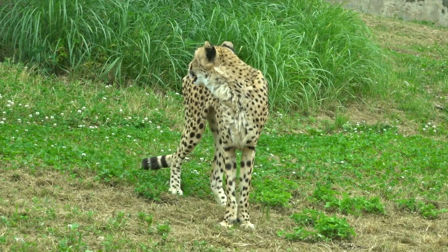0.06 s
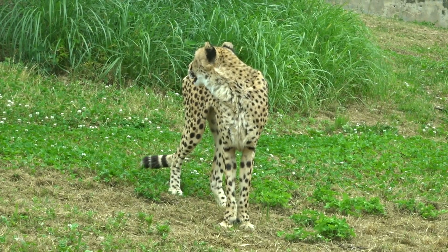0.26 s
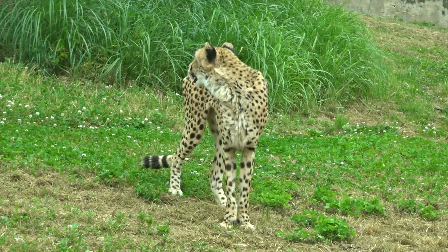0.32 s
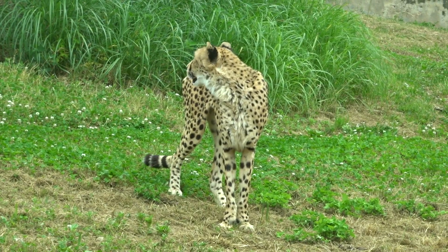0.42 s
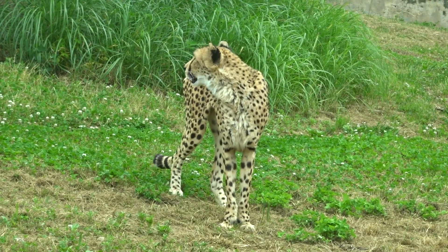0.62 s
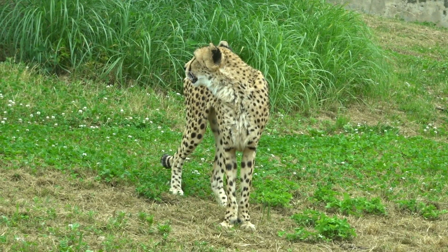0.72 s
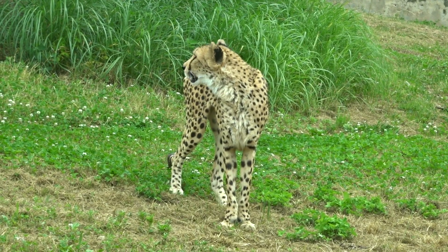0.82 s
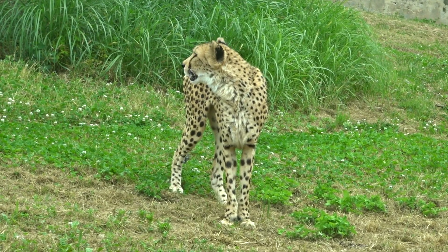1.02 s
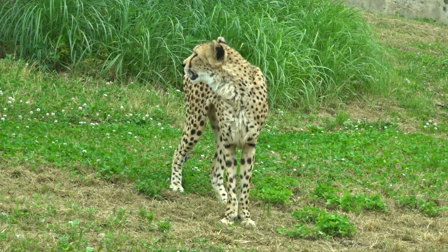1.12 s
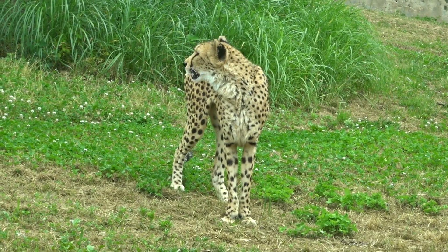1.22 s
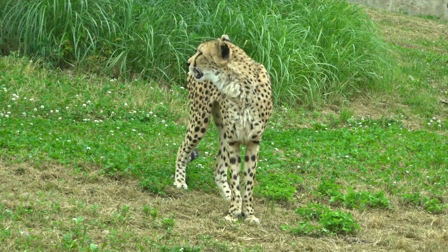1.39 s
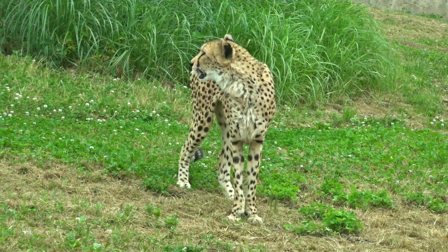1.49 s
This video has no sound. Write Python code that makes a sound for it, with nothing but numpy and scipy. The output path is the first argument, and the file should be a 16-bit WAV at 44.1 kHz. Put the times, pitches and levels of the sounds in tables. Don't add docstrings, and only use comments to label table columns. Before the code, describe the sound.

A small bird close on the left gives a raspy whistle leaping upward at 0.23-0.34 s, then a fast swooping warble at 0.71-0.82 s. A distant throaty caw starts at 0.1 s and rattles until 0.5, with a fainter one from 0.72 to 0.98. A falling chip at 1.1 and faint arched whistles follow until 1.5. Cicadas pulse, a cricket trills and a katydid scrapes over airy outdoor rumble.

```python
import sys
import numpy as np
from scipy import signal
from scipy.io import wavfile
from scipy.ndimage import uniform_filter1d

SR = 44100
rng = np.random.default_rng(int(sys.argv[2]) if len(sys.argv) > 2 else 0)


def to_wav(s):
    ch = np.atleast_2d(s).T
    pcm = np.round(np.clip(ch, -1, 1) * 32767)
    wavfile.write(sys.argv[1], SR, pcm.astype(np.int16))


def how_loud(loudness_db):
    steps = np.asarray(loudness_db, float) / 20
    return 10 ** steps


N = 68355
TIME = np.arange(N) / SR

# t/s, f/Hz, level/dB, level of the raspy half-pitch overtones/dB
RISE = [(.232, 2120, -38, -47), (.240, 2240, -40, -46), (.248, 2545, -30, -34), (.259, 2952, -26.5, -28.5),
        (.264, 3470, -25.5, -43), (.268, 4035, -15.5, -72), (.285, 4113, -19, -80),
        (.327, 4189, -21.5, -80), (.338, 4103, -35, -78)]
# t/s, f/Hz, level/dB
SQUEAK = [(.234, 4500, -42), (.241, 5010, -34.5), (.246, 6050, -33.5), (.251, 6450, -37), (.257, 6940, -43)]
# t/s, f/Hz, level/dB
WARBLE = [
    [(.713, 6300, -28), (.717, 5270, -25), (.7205, 4003, -22), (.727, 4720, -19), (.731, 5570, -20),
     (.7335, 6300, -23), (.736, 8360, -26)],
    [(.740, 4720, -34), (.743, 4330, -26), (.7475, 5064, -25), (.752, 3056, -28.5), (.755, 2714, -30.5),
     (.758, 3036, -29.5), (.761, 4110, -22), (.768, 4800, -23.5)],
    [(.771, 4092, -24), (.7755, 4098, -15.5), (.7785, 4118, -16.5), (.781, 3820, -27), (.784, 2770, -29),
     (.787, 2600, -37), (.791, 2890, -27.5), (.793, 4320, -27)],
    [(.7955, 4293, -49), (.799, 4187, -18.5), (.803, 4043, -14.5), (.810, 3755, -24), (.815, 3140, -32),
     (.821, 3030, -39), (.824, 2700, -47)],
]
# t/s, f/Hz, level/dB
UPPER_VOICE = [(.793, 4660, -49), (.80, 4635, -27.5), (.81, 4550, -37), (.818, 4570, -29),
               (.824, 4300, -45)]

# t/s, f/Hz, level/dB
SEEP = [(.286, 6920, -54), (.298, 7090, -31.5), (.316, 7180, -36), (.335, 7000, -30.5), (.358, 6864, -34),
        (.368, 6880, -33.5)]
TICK = [(.698, 6580, -61), (.705, 6720, -41), (.711, 6740, -67)]
CHIP = [(1.104, 3500, -47), (1.111, 3285, -41), (1.119, 2810, -27), (1.13, 2444, -41), (1.146, 2150, -46.5)]
# t/s, f/Hz, level/dB
ARCHES = [
    [(1.170, 3450, -49), (1.179, 3637, -46), (1.185, 3620, -53), (1.19, 4090, -48), (1.2, 4366, -46),
     (1.21, 4390, -41.5), (1.22, 4225, -46), (1.228, 3730, -40), (1.238, 3140, -56)],
    [(1.295, 3700, -45), (1.305, 3987, -45.5), (1.33, 4140, -49.5), (1.342, 4015, -40.5), (1.35, 3685, -40),
     (1.356, 3355, -48), (1.368, 2760, -47)],
    [(1.46, 3450, -55), (1.465, 3570, -46), (1.475, 3746, -51), (1.487, 3870, -44.5), (1.497, 3760, -45),
     (1.51, 3300, -48)],
]

# t/s, f/Hz
CAW_PITCH = [(.10, 338), (.135, 325), (.15, 333), (.163, 343), (.18, 357), (.195, 366), (.21, 371),
             (.24, 373), (.265, 370)]
# multiple, crest t/s, half length/s, level/dB
SWELLS = [(3, .153, .018, -49), (3, .185, .02, -55), (3, .228, .025, -49), (4, .148, .013, -49),
          (4, .2, .015, -57), (5, .175, .017, -47), (5, .243, .02, -43), (6, .118, .012, -51),
          (6, .161, .011, -46), (6, .208, .012, -51), (6, .25, .012, -50), (7, .183, .009, -48),
          (7, .213, .016, -46), (8, .148, .01, -52)]
# t/s, f/Hz, level/dB
HELD = [(.258, 1807, -39), (.266, 1754, -32.5), (.29, 1770, -34), (.3, 1750, -47)]
# start t/s, length/s, level/dB, sag/dB per s
RATTLES = [
    (0.253, 0.248, -32, 55),
    (0.724, 0.256, -52, 24),
]
# f/Hz, width/Hz, level/dB
TIGHT_THROAT = [(1067, 100, -6), (1578, 32, -6), (1750, 82, 6.5), (1893, 77, -2), (2015, 66, -0.5),
                (3380, 200, -2.5)]

# t/s, f/Hz, level/dB, pulse depth/0-1
LOW_CICADA = [(0, 8150, -47, 0), (.25, 8240, -43.5, 0.5), (.5, 8020, -43, 0.6), (.7, 7750, -39.5, 0.7),
              (.8, 7770, -35.5, 0.9), (.9, 7800, -36, 0.1), (.93, 7550, -49.5, 0), (1.09, 7350, -54, 0.15),
              (1.13, 7130, -79, 0.3), (1.55, 8000, -80, .4)]
# start t/s, peak level/dB
HIGH_PULSES = [(0.0169, -46), (0.0348, -48), (0.0722, -62), (0.1002, -43), (0.1191, -42), (0.1391, -36),
               (0.161, -37.5), (0.1875, -45), (0.2044, -43), (0.2244, -42), (0.2533, -38), (0.2718, -41),
               (0.2907, -36.5), (0.3122, -41), (0.3431, -42), (0.3611, -48), (0.387, -39), (0.404, -37),
               (0.4254, -35), (0.4459, -39), (0.4818, -47), (0.5117, -42), (0.5282, -40), (0.5487, -38.5),
               (0.5721, -40), (0.5911, -43), (0.62, -42), (0.6469, -42), (0.6669, -37), (0.6953, -44),
               (0.7148, -55), (0.7322, -40), (0.7572, -41), (0.7771, -37), (0.7986, -38), (0.8415, -44),
               (0.854, -41), (0.8709, -41), (0.9018, -39.5), (0.9228, -37), (1.044, -38), (1.0615, -34.5),
               (1.0824, -35.5), (1.1074, -36.5), (1.1927, -41), (1.2131, -37.5), (1.2346, -37.5),
               (1.258, -40), (1.291, -44), (1.3234, -39.5), (1.3623, -44), (1.3907, -43), (1.4092, -42),
               (1.4267, -40), (1.4466, -43.5), (1.4735, -52), (1.4945, -46), (1.5214, -42)]
# start t/s, length/s, level/dB
BOUTS = [
    (0, .045, -50),
    (.355, .115, -53),
    (.765, .1, -48),
    (1.047, .114, -49),
    (1.48, .07, -49),
]

# f/Hz, level/dB per Hz
AIR = [(15, 74), (25, 2.5), (538, -24.5), (1500, -17.5), (3640, -14.5), (7320, -25), (9330, -15.5),
       (10700, -21), (15600, -27.5)]
# f/Hz, likeness/0-1
LIKENESS = [(30, 0.55), (200, 0.38), (700, 0.15), (3000, 0.24), (8000, 0.051), (13000, 0.44)]


def in_time(rows):
    s, *columns = np.transpose(rows)
    return [np.interp(TIME, s, c) for c in columns]


def at_hz(points, hz):
    f, level = np.transpose(points)
    return np.interp(np.log(hz), np.log(f), level)


def rms_one(x):
    return x / np.sqrt(np.mean(np.abs(x) ** 2) + 1e-20)


def butter(x, order, hz, kind="low"):
    return signal.sosfilt(signal.butter(order, hz, kind, fs=SR, output="sos"), x)


def narrow(width_hz, channels=1):
    settle = 4000
    real, imaginary = rng.standard_normal((2, channels, N + settle))
    return rms_one(butter(real + 1j * imaginary, 2, width_hz / 2)[:, settle:])


def turns(hz):
    return 2 * np.pi * np.cumsum(hz) / SR


def gate(start, end, attack_s, release_s):
    return np.clip((TIME - start) / attack_s, 0, 1) * np.clip((end - TIME) / release_s, 0, 1)


def resonate(x, throat):
    out = 0
    for k, (hz, width, db) in enumerate(throat):
        r = np.exp(-np.pi * width / SR)
        poles = [1, -2 * r * np.cos(2 * np.pi * hz / SR), r * r]
        ring = signal.lfilter([1, 0, -1], poles, x + 1e-18) * (1 - r * r) / 2
        out = out + (-1) ** k * how_loud(db) * ring
    return out


def place(x, pan_db, wet_db, echo_db=-40, t60=1):
    lag = int(0.013 * SR)
    pan = how_loud(np.array([[pan_db], [-pan_db]]) / 2) / np.cosh(pan_db / 13.2)
    direct = (x + how_loud(echo_db) * np.pad(x, (lag, 0))[:N]) * pan
    t = TIME[:SR]
    trees = how_loud(-60 * t / t60)
    bush = how_loud(9) * np.exp(-t / 0.033)
    tail = rng.standard_normal((2, SR)) * (trees + bush) * np.clip(t / 0.007, 0, 1)
    tail = tail / np.sqrt(np.sum(tail ** 2, axis=1, keepdims=True))
    return direct + how_loud(wet_db) * signal.fftconvolve(x[None], tail, axes=1)[:, :N]


def whistle(rows, multiple=1, column=1, flutter_db=0.5):
    lines = [uniform_filter1d(c, size=50) for c in in_time(rows)]
    inside = uniform_filter1d(1. * ((TIME > rows[0][0]) & (TIME < rows[-1][0])), size=90)
    level = how_loud(lines[column] + flutter_db * narrow(560)[0].real)
    return np.sqrt(2) * level * inside * np.sin(multiple * turns(lines[0]))


def near_rise():
    rasp = 0
    for multiple, db in [(1.5, -1.5), (2, 1.5), (2.5, -14)]:
        rasp = rasp + how_loud(db) * whistle(RISE, multiple, column=2, flutter_db=0)
    squeak = whistle(SQUEAK, flutter_db=6) + how_loud(-4) * whistle(SQUEAK, multiple=.6, flutter_db=10)
    return butter(whistle(RISE) + rasp + squeak, 6, 7600)


def near_warble():
    lead = how_loud(-16) * whistle(WARBLE[0], flutter_db=5.5)
    syllables = whistle(sum(WARBLE[1:], []), flutter_db=2)
    return lead + syllables + whistle(UPPER_VOICE, flutter_db=5)


def near_bird():
    rise = place(near_rise(), pan_db=19.5, wet_db=-6.5, echo_db=-20)
    left, right = rise + place(near_warble(), pan_db=20, wet_db=-6.5, echo_db=-12, t60=0.63)
    left_lag = round(4e-5 * SR)
    return np.array([np.pad(left, (left_lag, 0))[:N], right])


def far_birds():
    thin = place(whistle(SEEP) + whistle(TICK), pan_db=-2, wet_db=-6)
    chip = place(whistle(CHIP), pan_db=11.5, wet_db=-7.5, echo_db=-8.5)
    arches = sum(whistle(rows, flutter_db=2.5) for rows in ARCHES)
    return thin + chip + place(arches, pan_db=4, wet_db=-6.5, echo_db=-10.5)


def caw_start():
    hz, = in_time(CAW_PITCH)
    out = 0
    for multiple, crest, half, db in SWELLS:
        level = how_loud(db + 3 + 1.5 * narrow(90)[0].real)
        out = out + level * np.exp(-((TIME - crest) / half) ** 2) * np.sin(multiple * turns(hz))
    return out


def caw_rattle():
    hz = 144.43 * np.clip(1 + .1 * narrow(120)[0].real, .3, 3)
    knocks = np.diff(np.floor(turns(hz) / (2 * np.pi)), prepend=0) * how_loud(1.5 * rng.standard_normal(N))
    breath = 0.039 * rng.standard_normal(N)
    mouth = [(1750, 640, 5), (3070, 2300, -7.5)]  # f/Hz, width/Hz, level/dB
    rattle = rms_one(resonate(resonate(knocks + breath, TIGHT_THROAT), mouth))
    out = 0
    for s, length, db, sag in RATTLES:
        out = out + rattle * how_loud(db - sag * np.abs(TIME - s)) * gate(s, s + length, 0.003, 0.0041)
    return out


def caw():
    return place(caw_start() + caw_rattle() + whistle(HELD, flutter_db=2.5), pan_db=3, wet_db=-10)


def low_cicada():
    hz, db, depth = in_time(LOW_CICADA)
    depth = np.clip(depth, 0, 1)
    since = (51.3 * TIME + 0.57) % 1
    clicks = 1.93 * np.exp(-since / 0.49) * how_loud(0.99 * narrow(47)[0].real)
    beat = 1 - depth + depth * clicks
    body = 0.39 * narrow(810) + .5 * narrow(1000, channels=2)
    buzz = np.sqrt(2) * np.real(body * np.exp(1j * turns(hz))) * how_loud(np.array([[1.6], [-1.6]]))
    ring = np.real(narrow(270) * np.exp(2j * np.pi * 7350 * TIME))
    return how_loud(db) * beat * buzz + how_loud(-55.5) * gate(.9, 1.115, 0.034, .015) * ring


def high_cicada():
    pitch_hz, fall_hz, pulse_s = 9440, 332, 0.0054
    buzz = np.real(narrow(1160, channels=2) * np.exp(2j * np.pi * 9350 * TIME))
    out = how_loud(-47.5 - 5.2 * TIME) * buzz * 2.2
    grain = 1 + 0.37 * narrow(550) + 0.27 * narrow(390, channels=2)
    for s, db in HIGH_PULSES:
        t = TIME - s
        swell = np.exp(-((t - 0.51 * pulse_s) / pulse_s) ** 2)
        phase = 2 * np.pi * (pitch_hz * t - fall_hz * t ** 2 / (4 * pulse_s))
        out = out + how_loud(db - 4) * swell * np.real(grain * np.exp(1j * phase))
    return out


def cricket():
    pitch_hz, pulses_per_s = 4620, 62.5
    out = 0
    for s, length, db in BOUTS:
        beat = (pulses_per_s * (TIME - s)) % 1
        tone = np.sin(np.pi * beat) ** 4 * np.sin(turns(pitch_hz - 800 * (beat - .5)))
        out = out + how_loud(db) * (TIME > s) * (TIME < s + length) * tone
    return place(2.2 * out * how_loud(3 * narrow(150)[0].real), pan_db=.5, wet_db=-7)


def katydid():
    period_s, first_end_s, stroke_s, stop_s = .158, 0.12, 0.087, 0.006
    before = (first_end_s - TIME) % period_s
    stroke = np.clip(1.6 * (1 - before / stroke_s), 0, 1) + np.exp(-(period_s - before) / stop_s)
    teeth = 0.38 + .9 * np.exp(1.6 * (np.cos(2 * np.pi * 35 * (TIME - .105)) - 1))
    white = rng.standard_normal((3, N))
    mixed = .5 * white[:2] + white[2] * np.array([[1.2], [-.8]])
    return how_loud(-44) * stroke * teeth * rms_one(butter(mixed, 2, [9500, 15500], "band"))


def air():
    out, edges = 0, 20 * 2 ** np.arange(0, 10.1, .5)
    white = rng.standard_normal((2, 2, N + SR))
    for k, (low, high) in enumerate(zip(edges, edges[1:])):
        mid, side = butter(white[k % 2], 2, [low, high], "band")[:, SR:]
        hz = np.sqrt(low * high)
        alike = np.clip(at_hz(LIKENESS, hz), -1, 1)
        fade_db = 0.5 * (1.3 - TIME) * np.clip(np.log2(hz / 700), 0, 1)
        top_fade_db = 4.2 * TIME * (hz > 11000)
        stereo = np.sqrt(1 + alike) * mid + np.sqrt(1 - alike) * side * np.array([[1], [-1]])
        out = out + how_loud(at_hz(AIR, hz) + fade_db - top_fade_db) * stereo
    return how_loud(-44) * rms_one(out) * how_loud(np.array([[.6], [-.6]]))


def scene():
    birds = near_bird() + far_birds() + caw()
    insects = low_cicada() + high_cicada() + cricket() + katydid()
    return birds + insects + air()


def band_limit(x):
    return signal.sosfilt(signal.butter(12, 15710, fs=SR, output="sos"), x)


def record(dry):
    topped = signal.sosfilt(signal.cheby2(20, 60, 15960, fs=SR, output="sos"), dry)
    mix = butter(topped, 2, 27, "high")
    return band_limit(mix)


dry = scene()
out = record(dry)
to_wav(out)
```